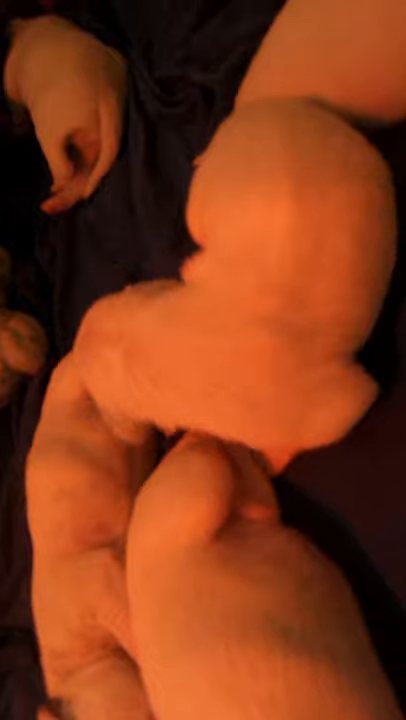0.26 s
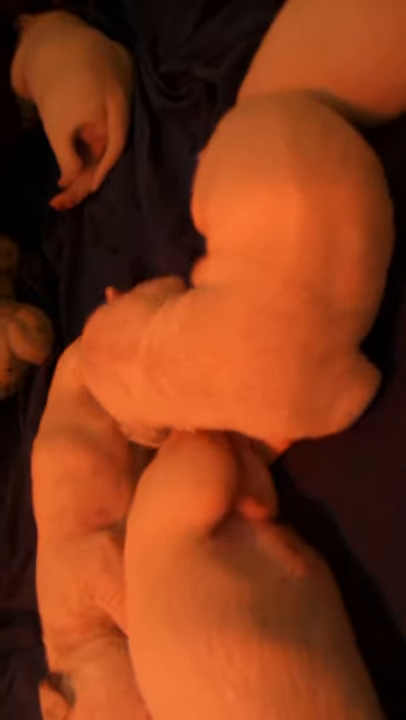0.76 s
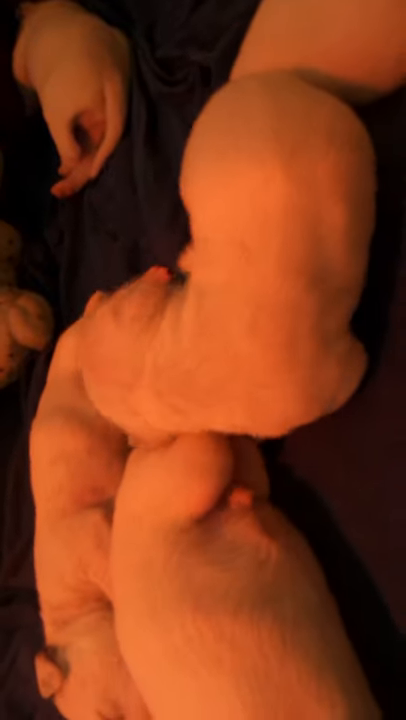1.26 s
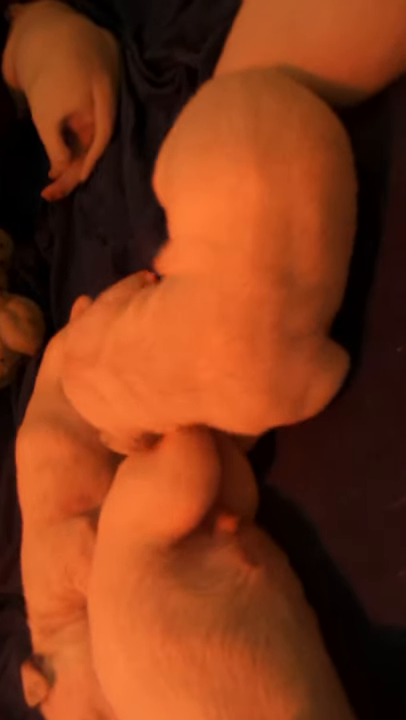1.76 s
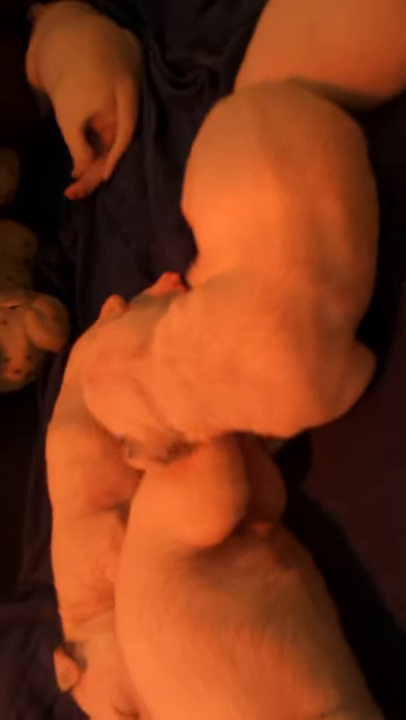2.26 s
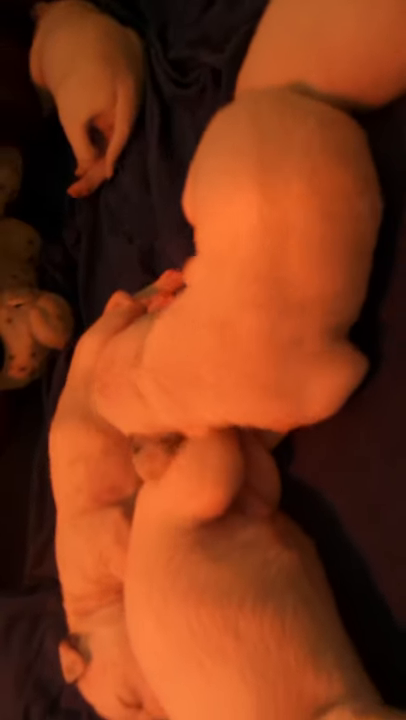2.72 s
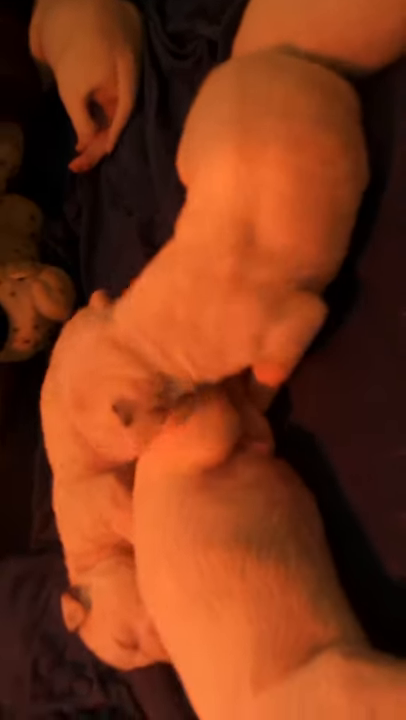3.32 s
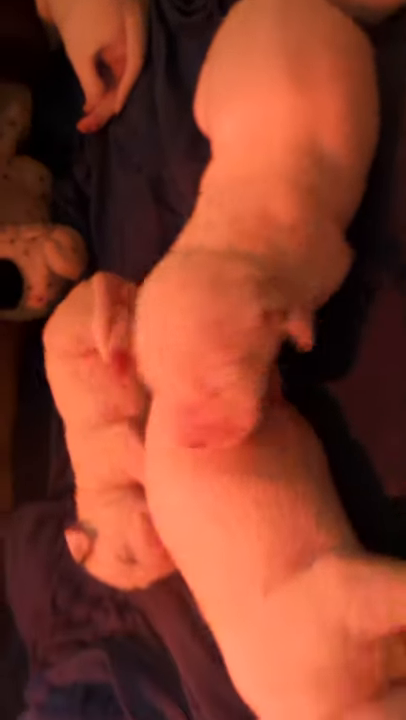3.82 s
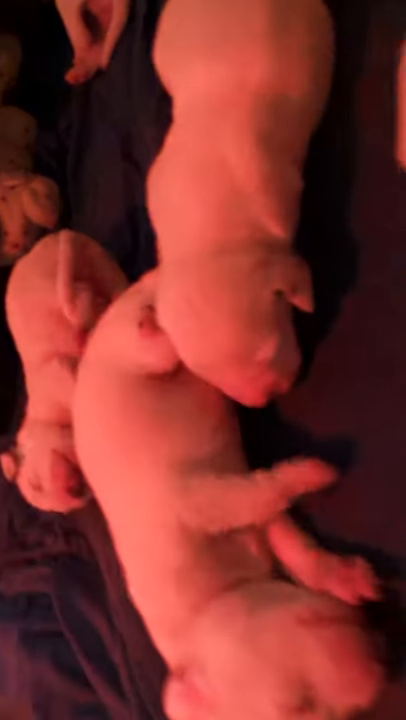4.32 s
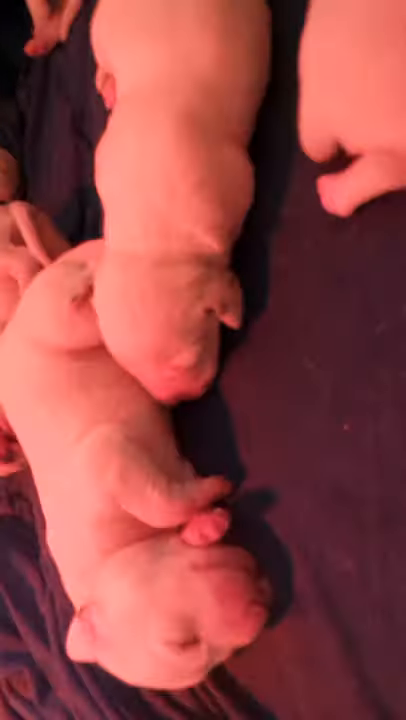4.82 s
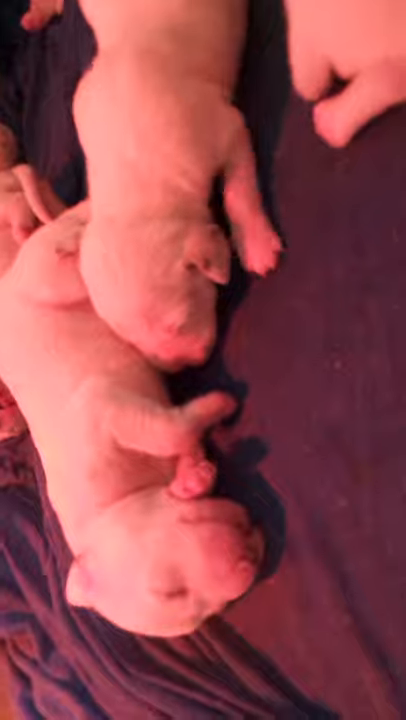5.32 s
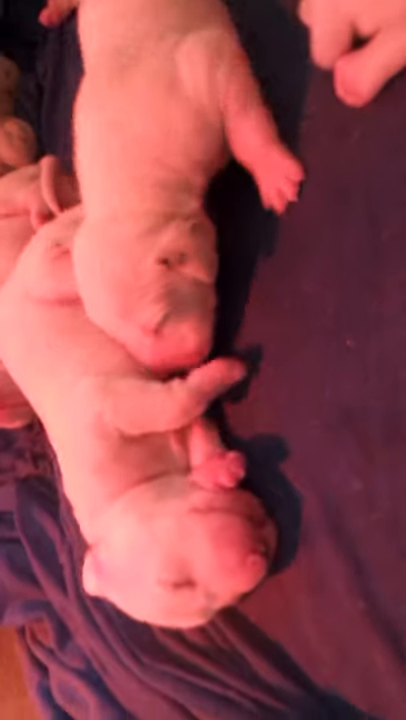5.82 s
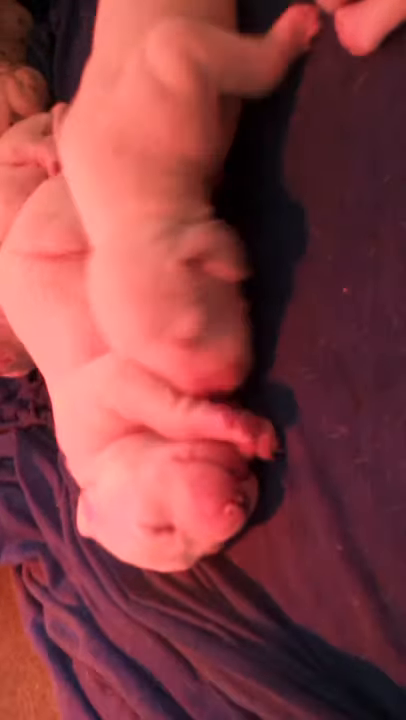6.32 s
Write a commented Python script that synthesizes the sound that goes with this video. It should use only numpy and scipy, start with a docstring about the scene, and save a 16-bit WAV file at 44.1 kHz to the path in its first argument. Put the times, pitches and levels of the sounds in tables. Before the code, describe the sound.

Newborn puppies on a blanket, heard very close in a small furnished room. Sharp arched squeals, some long, some mere yelps, leap up and tumble down in pitch, with breathy puffs after them. After the last loud squeal come raspy creaks, small whimpers and tiny lip ticks, then a second puppy's thin sinking whine under a short clear cry. Faint hiss lies beneath.

```python
"""Newborn puppies on a blanket in a small furnished room, close to a two-port microphone.
Squeals, stacked partials in high arcs, break and fall, with soft calls and rasping creaks among and after.
Late on, a second puppy whines a long falling note under one clear arched cry.
Breaths of filtered noise sound under and after the cries, with ringing lip ticks here and there.
Feedback delays ring on for about half a second over a faint hiss and a thin whistle."""
import sys
import numpy as np
from scipy import signal
from scipy.fft import rfft, irfft, next_fast_len
from scipy.io import wavfile
from scipy.ndimage import uniform_filter1d, minimum_filter1d

SR = 44100
rng = np.random.default_rng(int(sys.argv[2]) if len(sys.argv) > 2 else 0)


def file_out(sig):
    """Save sig as 16-bit WAV at sys.argv[1]."""
    # one column per channel
    cols = np.atleast_2d(sig).T
    # limit, then scale
    lim = np.clip(cols, -1, 1)
    pcm = np.round(lim * 32767).astype(np.int16)
    wavfile.write(sys.argv[1], SR, pcm)


N = 289737   # samples

# colour of a nearly shut mouth, sounding through the nose: (frequency [Hz], level [dB])
NASAL_MOUTH = [(280, -16.5), (400, 5.5), (600, -4), (850, -2), (1200, -2.5), (1700, -13.5), (2450, -12),
               (2900, -27), (3500, -25.5), (4300, -36), (5000, -27), (6500, -22), (15000, -66.5)]


def squeals():
    """Open-mouthed squeals: tight vocal folds and a wide mouth whose resonance moves."""
    # one table a cry: (time [s], pitch [Hz], level [dB], overtone slope [dB per octave],
    # mouth resonance [Hz], its lift [dB])
    cries = [
        [(0.012, 870, -44, -8, 1820, 11.0), (0.03, 925, -35.5, -11, 1810, 14), (0.052, 1232, -27, -12, 2070, 7),
         (0.076, 1244, -20.5, -13.5, 3270, 10.5), (0.108, 1384, -25, -8.5, 4200, 15),
         (0.138, 1453, -3, -3.5, 4300, 17), (0.16, 1341, -9, 4, 4560, 20), (0.192, 1542, -18, 1.5, 3300, 11.5),
         (0.236, 1380, -8, -5.5, 2760, 15), (0.248, 1362, -20.5, -10.5, 2840, 10.5),
         (0.262, 1354, -13.5, -7.5, 2704, 15.5), (0.374, 1322, -23.5, -4.5, 2670, 10.5),
         (0.386, 1300, -23, -3.5, 2700, 9), (0.402, 1049, -31, -4, 2730, 5.5), (0.424, 897.4, -24, 1, 2456, 8),
         (0.438, 831.3, -34.5, -8, 2470, 10), (0.454, 681.3, -26.5, -7, 2540, 6.5),
         (0.484, 573.9, -31, -9, 2304, 10.5), (0.498, 502.1, -30, -9.5, 2370, 13),
         (0.516, 453.7, -32, -5.0, 2470, 5), (0.542, 415.8, -30, -13.5, 2638, 10),
         (0.578, 348.0, -27.5, -3.5, 2220, 7), (0.598, 404, -27.5, -12, 2080, 12),
         (0.63, 440, -19.5, -6, 2170, 6)],
        [(1.17, 565.3, -49.5, -6.5, 2330, 13.5), (1.19, 644.8, -38, -2, 2430, 3.5),
         (1.204, 854.5, -31.5, 2.5, 2420, 10.5), (1.218, 1066, -24.5, -6.5, 2538, 12.5),
         (1.234, 1258, -19, 0, 2533, 1.5), (1.25, 1244, -17.5, -15, 2490, 12.5)],
        [(1.675, 479.6, -55.5, -2, 4740, 17), (1.707, 545.5, -40, -4.5, 4526, 7),
         (1.731, 841.6, -33.5, -3, 4310, 1.5), (1.749, 1112, -18.5, -11, 4593, 9.5),
         (1.771, 1346, -16.5, -18.5, 5177, 11.0), (1.777, 1676, -22.5, -9.5, 5300, 13.5),
         (1.787, 1835, -10, -16.5, 5500, 16), (1.805, 1668, -24.5, -24.5, 5190, 11.0),
         (1.821, 1213, -36, -15, 5010, 14.5), (1.829, 1134, -17, -18, 4920, 15),
         (1.842, 956, -30.5, -15.5, 4850, 10)],
        [(2.2, 459.0, -48, -10.5, 2490, 9.5), (2.212, 433, -49.5, -5.0, 2190, 7),
         (2.254, 826, -44.5, -2.5, 2090, 8.5), (2.28, 1114, -27.5, -9.5, 2160, 7),
         (2.3, 1296, -21.5, -10.5, 3447, 13), (2.33, 1323, -28.5, -7, 4753, 14),
         (2.35, 1655, -11.5, 7, 4600, 5), (2.386, 1227, -14.5, 9.5, 2661, 1.5),
         (2.42, 852, -16, 5.5, 2666, 13.5), (2.44, 746.5, -18, 0.5, 2398, 15),
         (2.456, 638.7, -18.5, 6.5, 2230, 5.5), (2.506, 420.4, -29.5, -13, 2620, 7.5),
         (2.54, 377, -32, -8.5, 2530, 8.5)],
        [(3.412, 1060, -42.5, -13.5, 2140, 7.5), (3.426, 1064, -30, -17, 3300, 8.5),
         (3.442, 1061, -26.5, -10, 5390, 6), (3.478, 1327, -22, 6.5, 5260, 10),
         (3.506, 1394, -7, 13.5, 5430, 10.5), (3.53, 1454, -17, 14.5, 4240, 6.5),
         (3.558, 1411, -11.5, 14, 3070, 17.5), (3.604, 1344, -19.5, 6.5, 2850, 6),
         (3.634, 1339, -10.5, 5.5, 2700, 16.5), (3.73, 1287, -25, -2, 2650, 11.5),
         (3.738, 1220, -24, 0.5, 2590, 7.5), (3.754, 1047, -23.5, -2.5, 2488, 13),
         (3.774, 955, -21, 0, 2338, 12), (3.812, 679.5, -20.5, -9.5, 2243, 6.5),
         (3.838, 634.5, -25, -2, 2023, 6.5), (3.856, 478, -30, -23, 2167, 7.5),
         (3.868, 433.2, -37.5, -13, 2337, 11.0), (3.885, 407.5, -33.5, -13, 2680, 10.5)],
    ]
    # colour of the wide mouth: (frequency [Hz], level [dB])
    wide_mouth = [(350, -22), (800, -10.5), (1400, -17), (2000, -21), (2700, -20.5), (3400, -27),
                  (4200, -28.5), (5700, -30.5), (6600, -40.5), (8200, -48), (10000, -32.5), (15000, -72)]
    return clear_voice(cries, wide_mouth, wobble=.006, flicker_db=2.5, soft_db=5.0)


def voice_breaks():
    """The voice breaks into half pitch or a rasp: rough fold pulses on short pitch arcs."""
    # (start [s], length [s], pitch at start, middle, end [Hz], level [dB], swell [dB],
    # mouth opening [dB], strong-weak beat [0-1])
    rasps = [(.63, 0.049, 781, 762, 692.7, -25, -19.5, -20, 0.13),
             (1.25, .028, 1410, 1410, 1376, -26.5, -3.5, -16, 0.5),
             (2.965, 0.051, 485, 476, 555.8, -36.5, 17, -27, 0.52),
             (4.158, .125, 382.3, 398, 404, -30, 12.5, -27, .5),
             (4.283, .03, 399.7, 385, 356, -25, -4, -28, 0)]
    slope_db = 0   # overtones, per octave
    return rough_voice(arcs(rasps, slope_db), wobble=0.01, jitter=0.0074, shimmer_db=2.5, air_db=-3.5)


def soft_calls():
    """Short clear soft calls: whimpers, their low gulps, a squeal's half-pitch undertone, brief whine notes."""
    # (start [s], length [s], pitch at start, middle, end [Hz], level [dB], swell [dB],
    # overtone slope [dB per octave], mouth resonance [Hz], its lift [dB])
    calls = [(1.795, .035, 910, 740, 544.7, -22, 2, 4, 1500, 13.5),
             (3.005, .09, 535, 555, 490.7, -31.5, 7.5, 2.5, 1030, 6),
             (3.096, 0.038, 446.2, 435, 441.7, -34.5, -11, 1, 880, 0),
             (4.698, .082, 876, 840, 866, -54, 8.5, 0, 2590, 9),
             (4.835, 0.04, 386, 390, 370, -31, 3, -1.5, 801, -2),
             (5.756, 0.028, 455.5, 440, 430, -23, -13, 3.5, 1200, 9.5),
             (6.055, .087, 298, 372, 409.6, -25.5, 16, -3.5, 1080, 5),
             (6.352, 0.03585, 350, 379, 363, -31, 4, -7, 1070, 4.5),
             (6.43, 0.16, 338, 317, 264, -48.5, 3.5, -1, 876, 1.5)]
    return clear_voice(arcs(calls), NASAL_MOUTH, wobble=0.0069, flicker_db=1.5, soft_db=1.0)


def creaks():
    """Uneven flaps of the vocal folds around one slow rate, with much air."""
    # (start [s], length [s], level [dB], swell [dB], overtone slope [dB per octave], mouth opening [dB])
    creak_rows = [(2.845, 0.15, -44.5, 6, -17, -16.5), (4.719, 0.14, -44, 16, -8, -18.5),
                  (5.082, 0.0294, -57.5, 8, -8, -16), (5.194, .03, -66, -2, -3, -15),
                  (5.547, 0.17, -43.5, 3, 2, -17), (5.877, 0.066, -42.5, -7, -4, -19),
                  (6.015, 0.043, -31, 4, -2, -24), (6.122, 0.3, -42, -3.5, 3, -15)]
    # (attack [s], rise from below [dB], release [s], fall at the end [dB])
    creak_edges = (.006, 3, 0.0055, 1.3)
    flaps_hz, beat = 140, 0.073   # rate before jitter; strong-weak beat, 0-1
    tables = []
    for start, length, level_db, swell_db, slope_db, mouth_db in creak_rows:
        s, db = envelope(start, length, level_db, swell_db, creak_edges)
        same = np.ones(len(s))
        columns = [s, flaps_hz * same, db, slope_db * same, mouth_db * same, beat * same]
        tables.append(np.column_stack(columns))
    return rough_voice(tables, wobble=.1, jitter=0.3, shimmer_db=3.5, air_db=19)


def arched_cry():
    """A clear cry over the whine: its pitch climbs and falls as one arch."""
    # (time [s], pitch [Hz], level [dB], overtone slope [dB per octave],
    # mouth resonance [Hz], its lift [dB])
    arch = [(5.605, 563.1, -28, -1.0, 1200, 6.5), (5.631, 653.4, -30.5, -1.0, 1280, 8.5),
            (5.677, 820, -29, -1.0, 1410, 8.0), (5.701, 858.4, -28, -1.0, 1440, 7.1),
            (5.717, 800, -45, -1.0, 1380, 6.6), (5.735, 725.6, -27.5, -1.0, 1340, 7.2),
            (5.756, 628, -20.5, -1.0, 1310, 9.2)]
    return clear_voice([arch], NASAL_MOUTH, wobble=0.007, flicker_db=3.5, soft_db=5.0)


def whine():
    """A second puppy's long thin whine: near-steady folds sink in pitch behind a nearly shut mouth."""
    # (time [s], pitch [Hz], level [dB], overtone slope [dB per octave],
    # mouth resonance [Hz], its lift [dB])
    falling_note = [(5.05, 723, -76.5, -5, 906, 5.8), (5.076, 623.5, -55.5, -0.5, 1265, 4),
                    (5.146, 615, -44, 0, 1240, 4.4), (5.168, 529.7, -46, 0, 1030, 3.1),
                    (5.23, 477.3, -39, 6.5, 1395, 7.7), (5.348, 466.6, -34, 4.5, 1130, 4.4),
                    (5.514, 421.3, -32.5, 2.5, 834, 10.5), (5.632, 393.7, -33.5, -3.0, 1200, 5.6),
                    (5.66, 376.2, -29.5, 4, 890, 3.1), (5.694, 417, -29.5, 8, 816, 4.6),
                    (5.724, 379.3, -27, -1, 869, 4.8), (5.752, 376, -35.5, -2, 1220, 6.0),
                    (5.836, 353.5, -35.5, -3.5, 790, 8.3), (5.876, 385.6, -32.5, -8, 781, 5.2),
                    (5.908, 425.4, -43.5, -19, 838, 6.0), (5.936, 369.5, -34.5, -9, 740, 7.1),
                    (5.982, 329, -43.5, -2, 810, 7.2), (6.02, 285, -35.5, -13, 947, 6.0)]
    return clear_voice([falling_note], NASAL_MOUTH, wobble=0.004, flicker_db=1.5, soft_db=1.5)


def clear_voice(tables, mouth, wobble, flicker_db, soft_db):
    """Near-steady fold cycles: effort slopes the first four partials, the mouth shapes all, each flickers."""
    resonance_octaves = 0.41   # half width of the moving mouth resonance, to 1/e of its lift in dB
    gate, hz, level_db, slope_db, mouth_hz, peak_db = played(tables, fade_s=.006)
    quick = signal.butter(2, [15, 70], "band", fs=SR, output="sos")
    wavering = signal.sosfilt(quick, rng.standard_normal((5, N)))
    tremor, *flicker = (rms_one(c) for c in wavering)
    on = np.flatnonzero(gate > 0)
    phase = np.cumsum(hz * np.exp(wobble * tremor) / SR)[on]   # cycles
    hz, sound, power, out = hz[on], 0, 0, np.zeros(N)
    for k in range(1, int(15000 / hz.min()) + 1):
        folds_db = slope_db[on] * np.log2(min(k, 4)) - soft_db * max(k - 4, 0)
        octaves_off = np.log2(k * hz / mouth_hz[on])
        lift_db = peak_db[on] * np.exp(-(octaves_off / resonance_octaves) ** 2)
        gain = from_db(folds_db + at_hz(mouth, k * hz) + lift_db) * (k * hz < 15000)
        flickering = from_db(flicker_db * flicker[k % len(flicker)][on])
        sound = sound + gain * flickering * np.cos(2 * np.pi * k * phase)
        power = power + gain ** 2 / 2
    out[on] = from_db(level_db[on]) * sound / np.sqrt(power)   # the level holds whatever the colour
    return gate * out


def rough_voice(tables, wobble, jitter, shimmer_db, air_db):
    """One pulse per fold cycle and a puff of air with it, through the closed and the open mouth."""
    # colours of the closed and the open mouth: (frequency [Hz], level [dB])
    closed_mouth = [(150, -35), (260, -48.5), (400, 7.5), (600, -20), (830, 2), (1200, -1), (1600, -14),
                    (2450, -9.5), (3000, -58.5), (5400, -48.5), (7500, -33), (10000, -59.5), (14000, -73)]
    open_mouth = [(180, -31.5), (330, 7.5), (700, 18), (1450, -14), (2020, 7.5), (2700, 9), (3400, -13),
                  (5000, -20.5), (6500, -39), (8000, -23), (10000, -16), (13000, -73.5)]
    gate, hz, level_db, sharp_db, mouth_db, beat = played(tables, fade_s=.006)
    chance = rng.standard_normal((3, N))
    quick = signal.butter(2, [15, 70], "band", fs=SR, output="sos")
    tremor = rms_one(signal.sosfilt(quick, chance[2]))
    cycle = np.cumsum(hz / SR).astype(int)
    uneven_hz = hz * np.exp(wobble * tremor + jitter * chance[0][cycle])   # cycles uneven in length
    phase = np.cumsum(uneven_hz / SR)
    strength = from_db(shimmer_db * chance[1][np.round(phase).astype(int)])
    # strong and weak pulses take turns
    strength = strength * (1 + np.clip(beat, 0, 1) * np.cos(np.pi * phase))
    pulses = np.zeros(N)
    for k in range(1, int(15000 / hz.min()) + 1):   # sharper fold closing: stronger overtones
        on = np.flatnonzero((gate > 0) & (k * hz < 15000))
        pulses[on] += from_db(sharp_db[on] * np.log2(k)) * np.cos(2 * np.pi * k * phase[on])
    puffs = (1 + np.cos(2 * np.pi * phase)) * (gate > 0)
    air = from_db(air_db) * rng.standard_normal(N) * puffs
    source = strength * pulses + air
    sound = colour(source, closed_mouth) + from_db(mouth_db) * colour(source, open_mouth)
    # local power, by which the sound is evened before it takes its level
    even = uniform_filter1d(sound ** 2, 1100) / (uniform_filter1d(gate, 1100) + 0.0015)
    return gate * from_db(level_db) * sound / np.sqrt(np.abs(even) + 1e-9)


def arcs(rows, *shared):
    """Short calls: pitch bends on a parabola through start, middle and end; other controls hold still."""
    # (attack [s], rise from below [dB], release [s], fall at the end [dB])
    voice_edges = (0.0095, 5.5, 0.016, 4.7)
    tables = []
    for start, length, first, middle, last, level_db, swell_db, *held in rows:
        s, db = envelope(start, length, level_db, swell_db, voice_edges)
        parabola = np.polyfit([0, .5, 1], [first, middle, last], 2)
        hz = np.polyval(parabola, (s - start) / length)
        still = [np.full(len(s), h) for h in (*shared, *held)]
        tables.append(np.column_stack([s, hz, db] + still))
    return tables


def breaths():
    """Turbulent air through nose and mouth: coloured noise in soft swells."""
    # (start [s], length [s], level [dB], swell [dB])
    breath_rows = [(0.374, 0.28, -52, 0), (.62, 0.052, -41, 12), (.68, 0.061, -55, -0.5),
                   (1.221, 0.069, -37, -7.5), (1.273, 0.043, -30.5, -9), (1.314, 0.088, -56.5, -8),
                   (1.746, 0.09, -35.5, 4.5), (1.806, 0.12, -49.5, -27), (2.349, 0.13, -56, -8.5),
                   (3.099, 0.075, -50, -3), (3.712, 0.19, -45, -10.5), (4.292, 0.15, -49, 3),
                   (4.79, 0.13, -60, 11), (5.022, 0.63, -60, 9.5), (5.628, .17, -48.5, 2),
                   (5.807, .33, -55.5, 0), (6.132, 0.049, -47.5, -9), (6.185, 0.56, -55.5, -9.5)]
    # (attack [s], rise from below [dB], release [s], fall at the end [dB])
    breath_edges = (0.0063, 6, 0.005, 2.3)
    # colour of the breath: (frequency [Hz], level [dB per Hz])
    breath_colour = [(200, -55), (500, -19.5), (1000, -16.5), (1600, -16.5), (2200, -14), (3000, -21),
                     (4800, -16.5), (7500, -28.5), (11000, -34.5), (16000, -36.5)]
    tables = [np.column_stack(envelope(*row, breath_edges)) for row in breath_rows]
    gate, level_db = played(tables, fade_s=.025)
    return gate * from_db(level_db) * rms_one(colour(rng.standard_normal(N), breath_colour))


def ticks():
    """Each parting of the lips rings a few cycles and dies away."""
    # (time [s], level before decay [dB], ring [Hz])
    lip_ticks = [(1.155, -50.5, 817), (2.181, -47, 654), (2.739, -51.5, 415.4), (2.83, -39.5, 1050),
                 (2.955, -35.5, 4730), (3.1993, -36, 5070), (4.572, -38.5, 4710), (4.6242, -45.5, 4043),
                 (5.048, -53, 652), (6.423, -41, 638)]
    out = np.zeros(N)
    for s, level_db, hz in lip_ticks:
        t = np.arange(600) / SR
        i = round(s * SR)
        out[i:i + 600] += from_db(level_db) * np.sin(2 * np.pi * hz * t) * np.exp(-t * hz / 4.0)
    return out


def ports(x):
    """Sound at the microphone: it reaches the right port a little later, and the two differ in colour."""
    # left port against right: (frequency [Hz], level [dB])
    left_colour = [(130, .3), (400, -1.1), (700, -.4), (1300, .6), (2400, -2.2), (4400, .5), (8100, 5),
                   (15000, -.6)]
    # delay of the right port, round the casing: (frequency [Hz], lag [radians])
    right_lag = [(100, .03), (1000, .5), (2200, 1.2), (3200, 1.7), (5000, 1.5), (8000, 1.7), (15000, 1.5)]
    size = next_fast_len(N + 4096)
    hz = np.arange(size // 2 + 1) * SR / size
    # half the difference goes to each port
    left = from_db(at_hz(left_colour, hz) / 2) * np.exp(.5j * at_hz(right_lag, hz))
    spectrum = rfft(x, size)
    return np.array([irfft(spectrum * left, size)[:N], irfft(spectrum / left, size)[:N]])


def room(x):
    """Ten feedback delays a side; each round loses what the decay table asks."""
    # what walls and bedding send back: (frequency [Hz], level [dB])
    wall_colour = [(300, 0), (1300, -2.5), (2700, 1), (4500, -3.5), (7000, -3), (12000, 0.5)]
    # time to fall by 60 dB: (frequency [Hz], decay [s])
    decay_times = [(300, 0.37), (800, 0.43), (2100, 0.39), (5500, 0.55), (12000, 0.27)]
    size = next_fast_len(N + SR)
    hz, out = np.arange(size // 2 + 1) * SR / size, []
    t60, spectrum = at_hz(decay_times, hz), rfft(colour(x, wall_colour), size)
    lags = np.geomspace(.011, .047, 20) * rng.uniform(.96, 1.04, 20)   # s
    for side in range(2):
        answer = 0
        for k, lag in enumerate(lags[side::2]):
            echo = from_db(-60 * lag / t60) * np.exp(-2j * np.pi * hz * lag)
            answer = answer + (-1) ** k * echo / (1 - echo)
        for lag in (.0017, .0043, .0009):   # scattering off furniture smears each echo
            z = np.exp(-2j * np.pi * hz * lag * (1 + .13 * side))
            answer = answer * (z - .6) / (1 - .6 * z)
        out.append(irfft(spectrum * answer, size)[:N] / np.sqrt(10))
    likeness = 0.083   # each port also hears a little of the other's tail
    return np.array([out[0] + likeness * out[1], out[1] + likeness * out[0]])


def background():
    """Faint coloured hiss, partly shared by the ports, and a thin whistle as one sine."""
    # colour of the hiss: (frequency [Hz], level [dB per Hz])
    hiss_colour = [(25, 3.5), (45, -7.5), (62, -11.5), (85, -22), (130, -13), (384, -10.5), (1160, -18),
                   (1760, -20.5), (2900, -18.5), (7870, -24), (16000, -22.5)]
    hiss_db = -61   # each port's own part
    whistle_hz, whistle_db = 2806, -82
    shared, left, right = (rms_one(colour(w, hiss_colour)) for w in rng.standard_normal((3, N)))
    whistle = from_db(whistle_db) * np.sin(2 * np.pi * whistle_hz * np.arange(N) / SR)
    return from_db(hiss_db) * (0.35 * shared + np.array([left, right])) + whistle


def played(tables, fade_s):
    """A gate, open while a table lasts, and all columns in time, eased as muscles move."""
    t, gate = np.arange(N) / SR, np.zeros(N)
    for rows in tables:
        gate[(t >= rows[0][0]) & (t <= rows[-1][0])] = 1
    s, *columns = np.vstack(tables).T
    controls = [gate] + [np.interp(t, s, c) for c in columns]
    return [uniform_filter1d(c, int(fade_s * SR)) for c in controls]


def envelope(start, length, level_db, swell_db, edges):
    """Times and levels of one sound: attack, a hold that swells or sags, release."""
    attack, attack_db, release, release_db = edges
    s = np.linspace(0, length, 13)
    rise = np.interp(s, [0, attack], [-attack_db, 0])
    fall = np.interp(length - s, [0, release], [-release_db, 0])
    return start + s, level_db + swell_db * (s / length - .5) + (rise + fall)


def colour(x, points, size=4096):
    """Causal (minimum-phase) filter that follows a table of (frequency [Hz], level [dB])."""
    hz = np.arange(size // 2 + 1) * SR / size
    cepstrum = irfft(np.log(from_db(at_hz(points, hz))))
    cepstrum[1:size // 2] *= 2   # folding the cepstrum forward makes the filter causal
    cepstrum[size // 2 + 1:] = 0
    return signal.fftconvolve(x, irfft(np.exp(rfft(cepstrum))))[:N]


def at_hz(points, hz):
    """Reads a spectrum table on a log frequency axis."""
    p = np.array(points)
    return np.interp(np.log(np.maximum(hz, 1)), np.log(p[:, 0]), p[:, 1])


def from_db(db):
    """Amplitude gain of a level in dB."""
    return 10 ** (np.asarray(db) / 20)


def rms_one(x):
    """Scaled to unit rms."""
    return x / np.sqrt(np.mean(x ** 2) + 1e-20)


def scene():
    """The litter at the microphone, direct and by way of the room, over the background."""
    litter = (squeals() + voice_breaks() + soft_calls() + creaks()
              + arched_cry() + whine() + breaths() + ticks())
    room_db = -8.5
    return ports(litter) + from_db(room_db) * room(litter) + background()


def record(dry):
    """The bass is thinned, a suppressor lowers the pauses, a limiter eases high peaks, the top is cut."""
    thin = signal.sosfilt(signal.butter(2, 100, "high", fs=SR, output="sos"), dry)
    # noise suppressor: passages below the threshold sink further
    threshold_db, ratio, most_db = -55.5, 1, 6.5
    power = np.abs(uniform_filter1d(np.mean(thin ** 2, axis=0), size=2205))
    level_db = 10 * np.log10(power + 1e-12)
    thin = thin * from_db(np.clip(ratio * (level_db - threshold_db), -most_db, 0))
    # limiter: one gain for both ports, eased over 10 ms
    headroom = np.minimum(1, .92 / (np.abs(thin).max(axis=0) + 1e-9))
    gain = uniform_filter1d(minimum_filter1d(headroom, size=441), size=441)
    top_cut = signal.cheby2(14, 70, 16150, fs=SR, output="sos")   # 70 dB down from 16150 Hz
    return signal.sosfilt(top_cut, thin * gain)


dry = scene()
out = record(dry)
file_out(out)
```